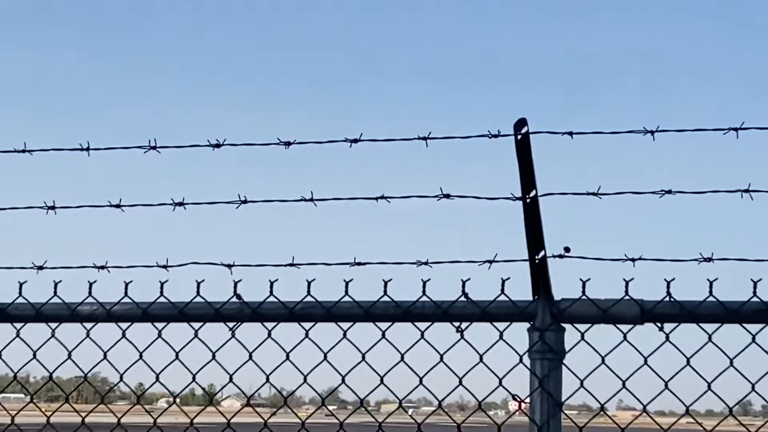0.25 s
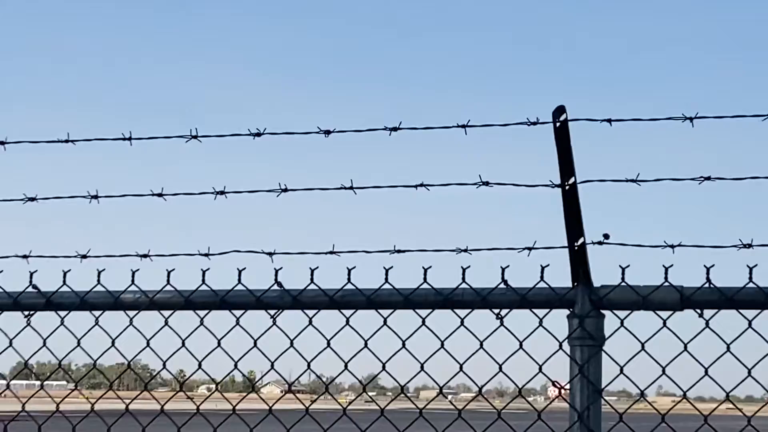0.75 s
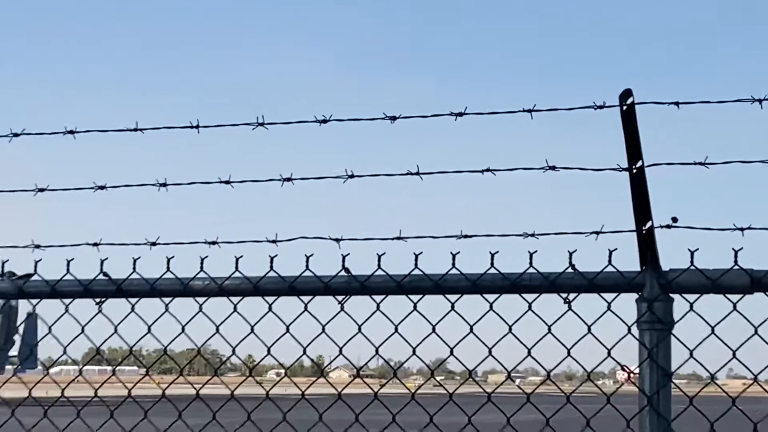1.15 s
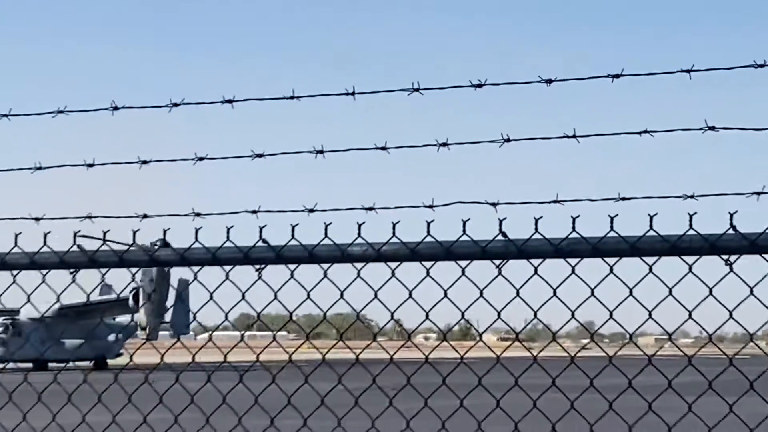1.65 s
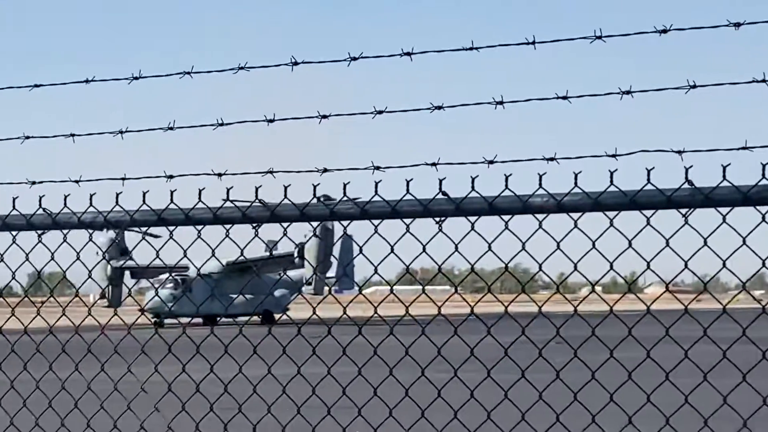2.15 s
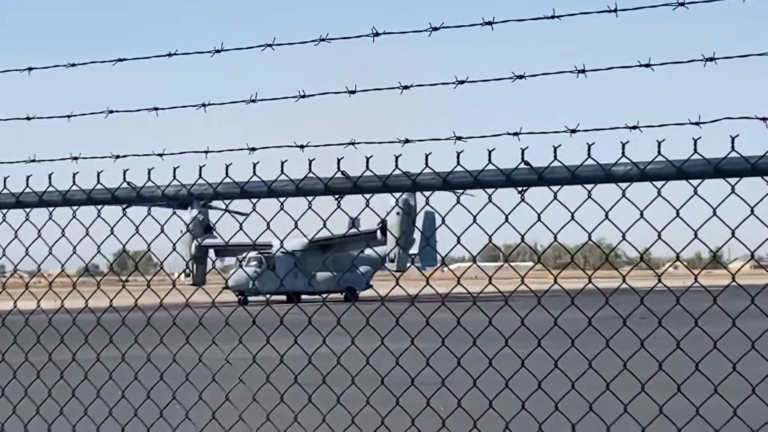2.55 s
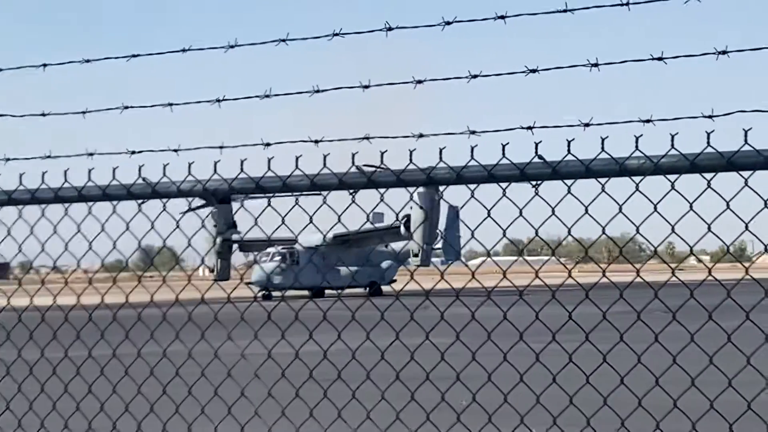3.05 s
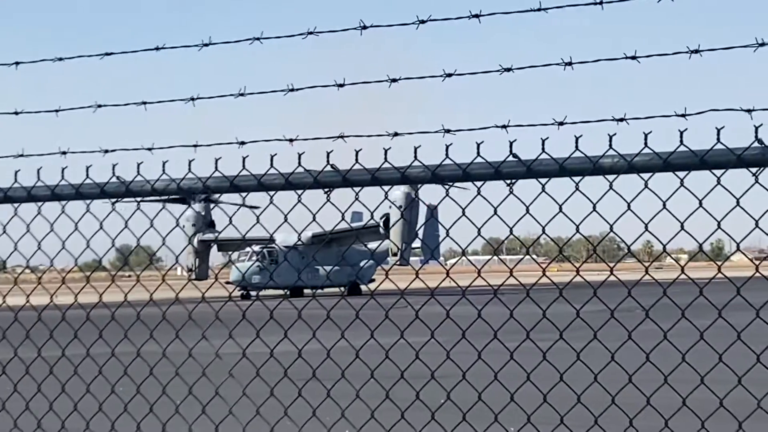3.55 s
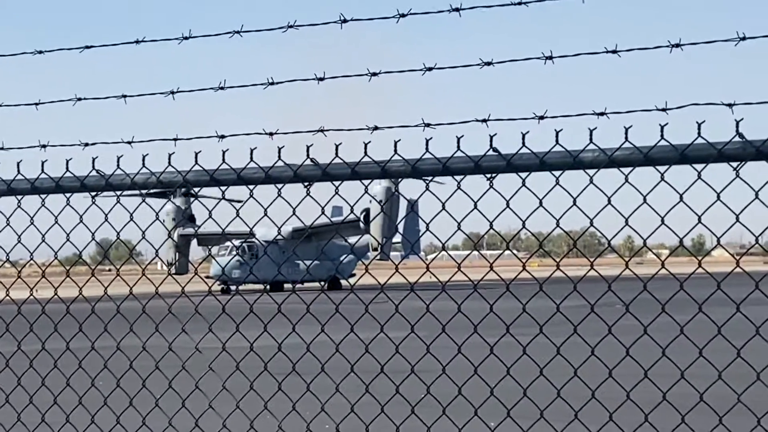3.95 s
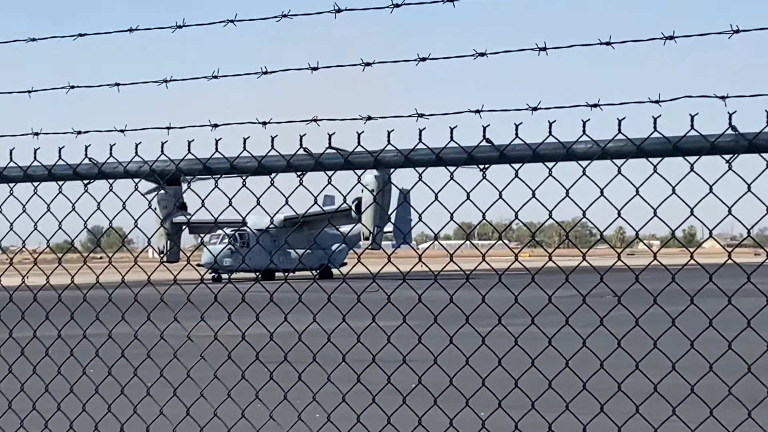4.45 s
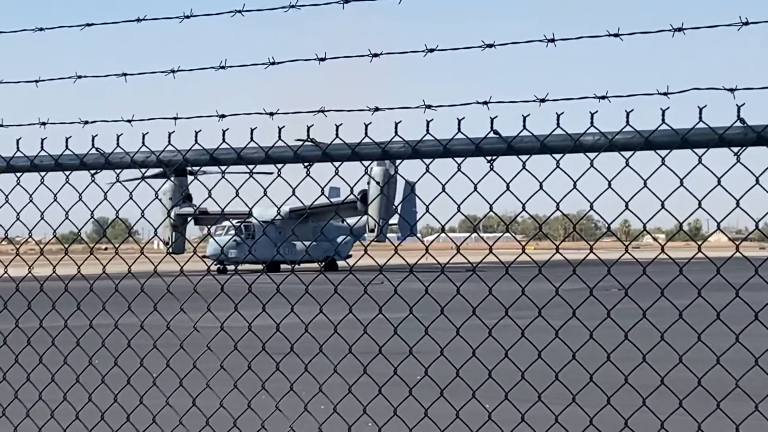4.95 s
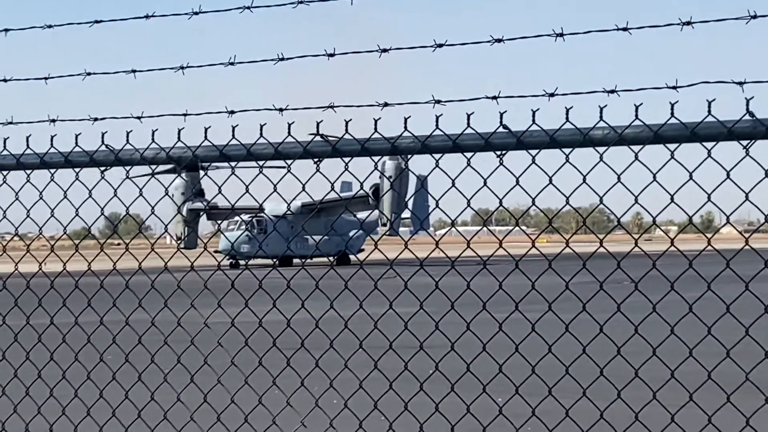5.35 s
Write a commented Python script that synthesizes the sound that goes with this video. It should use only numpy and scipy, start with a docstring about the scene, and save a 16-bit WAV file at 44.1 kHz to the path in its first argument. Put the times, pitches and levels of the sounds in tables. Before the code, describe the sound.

A tiltrotor idles on an open apron, heard on a handheld stereo phone from behind a fence. A constant rushing roar is chopped about fifteen times a second over low, uneven rotor thudding. At first the midrange is slightly dulled and leans left; from one to just over two seconds the sound brightens and a piercing whine emerges, then wavers to the end.

```python
"""Tiltrotor idling on an apron

Recorded in stereo on a hand-held phone from behind the perimeter fence, first turned away, then facing.
Rotors: low noise and short pulses at the blade rate. Turbines: coloured noise, rush and hiss, chopped
some fifteen times a second. Gearboxes, drive shaft and compressor: wavering sine tones.
The midrange and the whine open up as the phone turns, then swell and sink with the breeze."""
import sys
import numpy as np
from scipy import signal
from scipy.fft import rfft, irfft, next_fast_len
from scipy.io import wavfile
from scipy.ndimage import uniform_filter1d

SR = 44100
rng = np.random.default_rng(int(sys.argv[2]) if len(sys.argv) > 2 else 0)


def to_wav(sig):
    """Store sig (one row per channel, or 1-D mono) as 16-bit WAV at the path in sys.argv[1].

    Samples outside -1..1 are clipped; the rate is SR.
    """
    pcm = np.clip(np.atleast_2d(sig), -1, 1) * 32767
    pcm = np.round(pcm).astype(np.int16)
    wavfile.write(sys.argv[1], SR, pcm.T)  # frames by channels


N = 246959
TIME_S = np.arange(N) / SR
FFT_SIZE = next_fast_len(N)
BIN_HZ = np.fft.rfftfreq(FFT_SIZE, 1 / SR)

BLADE_HZ = 14.88  # blade passes per second
GEAR_HZ, DRIVE_HZ = 1094.7, 996.0  # tooth-mesh rates of the main gear and the drive gear
TURN_START_S, TURN_END_S = 1.0, 2.24  # the phone turns towards the aircraft
FADES_PER_S = 4.84


def undb(db):
    """Decibels to gain."""
    return 10 ** (np.asarray(db) / 20)


def unit(x):
    """Scale to rms 1."""
    return x / np.sqrt(np.mean(x ** 2))


def curves(table):
    """The columns of a table after start_s, each as one value per sample."""
    start_s, *columns = np.transpose(table)
    return [np.interp(TIME_S, start_s, column) for column in columns]


def humps(table):
    """Smooth rises and falls, one for each row of (centre_s, half_length_s, height)."""
    return sum(height * np.exp(-((TIME_S - centre_s) / half_s) ** 2) for centre_s, half_s, height in table)


def bin_gains(points):
    """Gain at each frequency bin, from (pitch_hz, level_db) points joined on a log axis."""
    hz, db = np.transpose(points)
    return undb(np.interp(np.log(BIN_HZ + 1), np.log(hz), db))


def colour(x, gains):
    """Filter by a gain per frequency bin."""
    return irfft(rfft(x, FFT_SIZE) * gains, FFT_SIZE)[:N]


def walk(rate):
    """Random levels held 1 / rate s, smoothed twice, cut to length and scaled to rms 1."""
    hold = int(SR / rate)
    steps = np.repeat(rng.standard_normal(N // hold + 2), hold)
    smooth = uniform_filter1d(uniform_filter1d(steps, hold), hold)
    return unit(smooth[:N])


def turbulence(points, flicker_db, flicker_rate, count=9):
    """Coloured noise whose octaves each flicker as eddies come and go."""
    octave = np.log2(np.clip(BIN_HZ / 40, 1, 2 ** (count - 1)))  # octaves above 40 Hz
    gains, out = bin_gains(points), 0
    for k in range(count):
        share = np.sqrt(np.clip(1 - abs(octave - k), 0, 1))
        band = colour(rng.standard_normal(N), gains * share)
        out = out + band * undb(flicker_db * walk(flicker_rate))
    return unit(out)


# How hard the blades chop the sound on its way to the fence.
# Columns: start_s, strength (1 = usual), rush_lag (blade passes), hiss_lag (blade passes)
BLADE_CHOP = [(0, .6, 1.03, 0.36), (1.0, 0.32, 0.79, .5), (1.7, 0.8, 0.76, 0.67), (2.2, 0.52, 0.75, 0.55),
              (2.8, 0.7, 0.67, .85), (3.8, 0.99, 0.7, 0.85), (4.5, 0.5, 0.62, 1.05), (5.0, 0.5, 0.63, 1.04),
              (5.6, 0.77, 0.57, 0.9)]


def swish(blade, depth_db, lag, edge=0.57):
    """Gain that swells once per passing blade, lopsided in time, its depth scaled by the chop strength."""
    angle = 2 * np.pi * (blade - lag)
    shape = np.cos(angle) - edge * np.sin(2 * angle)
    return unit(undb(depth_db * curves(BLADE_CHOP)[0] * shape))


def tone(hz, scatter, scatter_rate, wander_hz):
    """A steady tone plus a share scattered by the hot, swirling air, which makes it flutter."""
    phase = 2 * np.pi * np.cumsum(hz + wander_hz * walk(2.01)) / SR
    in_step = (1 + scatter * walk(scatter_rate)) * np.sin(phase)
    return unit(in_step + scatter * walk(scatter_rate) * np.cos(phase))


def turned_away():
    """1 while the phone points away from the aircraft, 0 once it faces it."""
    return np.interp(TIME_S, [TURN_START_S, TURN_END_S], [1, 0])


# The breeze carries the sound over to the fence, or holds it back.
# Columns: centre_s, half_length_s, strength (1 = full swell)
BREEZE_SWELLS = [(2.42, 0.3, 0.98), (3.62, 0.22, -0.55), (4.03, 0.4, -0.23), (5.23, .12, -0.2),
                 (5.43, 0.08, 0.69)]


def heard_db(source):
    """Level from (faced_db, away_change_db, full_swell_lift_db, random_fading_db)."""
    faced_db, away_db, swell_db, fade_db = source
    turn_and_swell_db = away_db * turned_away() + swell_db * humps(BREEZE_SWELLS)
    return faced_db + turn_and_swell_db + fade_db * walk(FADES_PER_S)


# Weak wavering tones: the drive gear's fundamental, and what may be a second gearbox.
# Columns: pitch_hz, level_db (at the median level of the rush)
WEAK_TONES = [(996, -43.5), (1009.5, -46), (1114.3, -42), (2226, -49), (4320, -56.5)]


def shaft_hum_and_weak_tones(rush_db):
    """A low drive-shaft hum and weak wavering tones that come forward with the engines' rush."""
    hum = tone(14 * BLADE_HZ, scatter=.12, scatter_rate=8, wander_hz=.15)
    tones = sum(undb(db) * tone(hz, scatter=0.32, scatter_rate=33, wander_hz=0.914)
                for hz, db in WEAK_TONES)
    return (hum * undb(-35) + tones) * undb(rush_db - np.median(rush_db))


# Compressor level. Values: faced_db, away_change_db, full_swell_lift_db, random_fading_db
COMPRESSOR_LEVEL = (-48, -8, 0, 1)
# Its whistle comes forward around the turn. Columns: centre_s, half_length_s, lift_db
COMPRESSOR_BEAM = [(1.3, .2, 9), (1.95, .28, 7)]


def compressor_whistle():
    """The compressor's thin whistle, a single high tone that flutters in the swirling air."""
    whistle = tone(5415.7, scatter=.3, scatter_rate=31, wander_hz=2.11)
    return whistle * undb(heard_db(COMPRESSOR_LEVEL) + humps(COMPRESSOR_BEAM))


# Colour of the blades' whistle. Columns: pitch_hz, level_db (per Hz)
WHISTLE_COLOUR = [(5200, -34), (5650, 4), (5800, 3), (6050, -5), (6350, -35)]


def blade_whistle(blade, start_db=-41.5, fade_db_per_s=5.5):
    """A narrow band of breathy noise that swells with each passing blade and fades away steadily."""
    air = turbulence(WHISTLE_COLOUR, flicker_db=2.5, flicker_rate=30)
    puffs = air * swish(blade, depth_db=13, lag=0.43, edge=0.33)
    return puffs * undb(start_db - fade_db_per_s * TIME_S)


def turbine_hiss(blade, points):
    """Fine hiss of the engines; each blade's wake ruffles it a little differently."""
    air = turbulence(points, flicker_db=1.6, flicker_rate=60)
    uneven_blade = blade + 0.11 * walk(9.6)
    return air * swish(uneven_blade, depth_db=1.47, lag=curves(BLADE_CHOP)[2])


# Hiss that reaches the phone only side-on, before the turn is over. Columns: pitch_hz, level_db (per Hz)
SIDELONG_COLOUR = [(1800, -21), (2500, 2), (3050, 2), (3700, -11), (6300, -26), (7400, -11), (8500, -39)]


def sidelong_hiss(blade):
    """Turbine hiss that dies out as the phone turns to the aircraft."""
    return turbine_hiss(blade, SIDELONG_COLOUR) * undb(-39) * turned_away()


# Colours of the hiss and the intake. Columns: pitch_hz, level_db (per Hz)
HISS_COLOUR = [(1500, -30), (2700, 6), (3400, 5), (4300, -3.5), (5200, -2.5), (5800, 3.5), (6200, 1),
               (6700, 3), (7450, -8), (8200, -13.5), (9500, -29), (11500, -36), (14000, -50)]
INTAKE_COLOUR = [(2000, -38), (3400, -5), (4100, 0), (4900, 3), (5400, 1.5), (6200, -5.5), (8000, -54)]
# Their levels. Values: faced_db, away_change_db, full_swell_lift_db, random_fading_db
HISS_LEVEL = (-35.5, -0.5, 0, 1.1)
INTAKE_LEVEL = (-37.5, -1, -1, -1.45)
# The hiss flares and sinks more quickly than the breeze. Columns: centre_s, half_length_s, lift_db
HISS_FLARES = [(1.29, 0.061, 2.5), (2.53, .14, 0.5), (3.12, 0.34, -1.3), (3.87, 0.13, 1),
               (4.97, 0.13, -0.5), (5.55, .07, 2)]


def hiss_and_intake(blade):
    """Two bands of turbine hiss, separately ruffled, that flare together."""
    flare_db = humps(HISS_FLARES)
    hiss = turbine_hiss(blade, HISS_COLOUR) * undb(heard_db(HISS_LEVEL) + flare_db)
    intake = turbine_hiss(blade, INTAKE_COLOUR) * undb(heard_db(INTAKE_LEVEL) + flare_db)
    return hiss + intake


# Overtones of the two gear meshes. Columns: multiple, level_db (against their gear's level)
GEAR_ORDERS = [(2, -8.5)]
DRIVE_ORDERS = [(3, -9.5), (4, -16.5), (5, -18)]
# Those gears' levels. Values: faced_db, away_change_db, full_swell_lift_db, random_fading_db
GEAR_LEVEL = (-32.5, -7, 2, -1)
DRIVE_LEVEL = (-36, -5.5, 3.5, 0.5)
# The drive overtones sink back or come forward. Columns: centre_s, half_length_s, lift_db
DRIVE_BEAM = [(1.9, 0.55, -6), (4.3, .5, 1.5), (5.5, .35, 1.5)]
# The loudest whine, the main gear's fundamental. Columns: start_s, level_db
GEAR_WHINE = [(0, -42), (.2, -36.5), (.6, -34.5), (.72, -38), (1.06, -40), (1.17, -35), (1.45, -33.5),
              (1.75, -29), (2.1, -26), (2.35, -25.5), (2.52, -30.5), (2.95, -26.5), (3.08, -28.5),
              (3.3, -27.5), (3.6, -33.5), (3.88, -27), (4.4, -26.3), (4.75, -27.5), (4.95, -31),
              (5.08, -26.5), (5.3, -33), (5.47, -29.5), (5.6, -29)]
# The whine at twice the drive gear's mesh rate. Columns: start_s, level_db
DRIVE_WHINE = [(0, -51), (.7, -36), (1.5, -50), (1.72, -38), (2.0, -34), (2.27, -28.5), (2.5, -39),
               (2.7, -31.5), (3.03, -47), (3.25, -34.5), (3.6, -33.5), (4.0, -37.5), (4.55, -40),
               (4.85, -32), (5.2, -36.5), (5.5, -32.5)]
# Its close neighbour, which beats against it. Columns: start_s, level_db
NEIGHBOUR_WHINE = [(0, -36.5), (.7, -48), (1.45, -54), (1.75, -45), (2.05, -54), (2.3, -32), (2.6, -38),
                   (2.95, -48), (3.25, -31), (3.6, -49), (4.3, -47), (5.05, -53), (5.45, -37), (5.6, -33)]
# The main gear's upper overtones, a narrow beam that wanders across the phone.
# Columns: start_s, third_overtone_db, fourth_overtone_db (three and four times the mesh rate)
GEAR_BEAM = [(0, -57, -60), (1.1, -56, -62), (1.4, -50, -58), (2.0, -50.5, -55), (2.6, -53, -51),
             (3.0, -48, -49.5), (3.35, -47.5, -49), (3.6, -55, -50), (3.8, -45, -47), (4.2, -45.5, -45.5),
             (4.55, -51, -51), (5.05, -56, -55), (5.6, -49.5, -52)]


def main_gear(blade):
    """The main gear's tooth-mesh tone and overtones; the highest two wander in level on their own."""
    main = tone(GEAR_HZ, scatter=0.073, scatter_rate=27, wander_hz=0.27)
    main = main * swish(blade, depth_db=0.5, lag=0.44) * undb(curves(GEAR_WHINE)[0])
    overtones = sum(undb(db) * tone(k * GEAR_HZ, scatter=0.11 * k, scatter_rate=37, wander_hz=0.302 * k)
                    for k, db in GEAR_ORDERS)
    third = tone(3 * GEAR_HZ, scatter=0.37, scatter_rate=38, wander_hz=0.635)
    fourth = tone(4 * GEAR_HZ, scatter=0.75, scatter_rate=45, wander_hz=2.13)
    third_db, fourth_db = curves(GEAR_BEAM)
    beam = third * undb(third_db) + fourth * undb(fourth_db)
    return main + overtones * undb(heard_db(GEAR_LEVEL)) + beam


def drive_gear(blade):
    """The drive gear's overtones, chopped by the blades, and a close pair of tones that beats."""
    second = tone(2 * DRIVE_HZ, scatter=0.23, scatter_rate=70, wander_hz=0.803)
    second = second * swish(blade, depth_db=0.5, lag=0.82)
    neighbour = tone(2019.5, scatter=0.26, scatter_rate=59, wander_hz=1.53)
    pair = second * undb(curves(DRIVE_WHINE)[0]) + neighbour * undb(curves(NEIGHBOUR_WHINE)[0])
    overtones = sum(undb(db) * tone(k * DRIVE_HZ, scatter=0.21 * k, scatter_rate=45, wander_hz=0.45 * k)
                    for k, db in DRIVE_ORDERS)
    overtones = overtones * undb(heard_db(DRIVE_LEVEL) + humps(DRIVE_BEAM))
    return pair + overtones * swish(blade, depth_db=4.0, lag=0.89)


# The low part of the engines' roar. Columns: pitch_hz, level_db (per Hz)
ROAR_COLOUR = [(120, -5), (280, 0), (430, 3.5), (650, 2), (900, -1.5), (1300, -14.5), (2500, -42.5)]
# Its level. Values: faced_db, away_change_db, full_swell_lift_db, random_fading_db
ROAR_LEVEL = (-27.5, -0.04, 2.5, 0.64)


def exhaust_roar(blade):
    """The low roar of the engines, only lightly chopped and nearly as loud with the phone turned away."""
    air = turbulence(ROAR_COLOUR, flicker_db=-0.2, flicker_rate=23)
    # the negative depth dips where a positive one swells
    return air * swish(blade, depth_db=-0.3, lag=0.67) * undb(heard_db(ROAR_LEVEL))


# The bright part of the engines' roar. Columns: pitch_hz, level_db (per Hz)
RUSH_COLOUR = [(200, -15), (450, -4), (800, 0.5), (1100, 0.5), (1350, 1), (1600, 0), (1900, 1.7), (2020, 2),
               (2110, 0.5), (2500, -6), (3200, -14.5), (4200, -17), (7000, -47), (12000, -70)]
# Its level. Values: faced_db, away_change_db, full_swell_lift_db, random_fading_db
RUSH_LEVEL = (-25, -3, 0.7, 1.3)


def exhaust_rush(blade, rush_db):
    """The bright roar of the engines, chopped by the blades."""
    air = turbulence(RUSH_COLOUR, flicker_db=.5, flicker_rate=44)
    return air * swish(blade, depth_db=2.5, lag=curves(BLADE_CHOP)[1]) * undb(rush_db)


# A reflection cancels a band that slides down as the phone turns. Columns: start_s, pitch_hz, depth_db
REFLECTION_NOTCH = [(0, 4900, 2.5), (1.0, 4540, 3), (1.6, 4300, 2.5), (2.1, 3480, 2.5), (2.7, 3430, 2),
                    (3.9, 3570, 1), (4.5, 3650, 3.5), (5.0, 3400, 4.5), (5.6, 3650, 4.5)]


def sliding_notch(x, octaves=0.26, size=512):
    """Hollow out the band that the reflection cancels."""
    hz, s, frames = signal.stft(x, SR, nperseg=size)
    start_s, notch_hz, depth_db = np.transpose(REFLECTION_NOTCH)
    distance = np.log2((hz[:, None] + 1) / np.interp(s, start_s, notch_hz)) / octaves
    gain = undb(-np.interp(s, start_s, depth_db) * np.exp(-distance ** 2))
    return signal.istft(frames * gain, SR, nperseg=size)[1][:N]


# The two rotors, the second one stronger. Columns: lag (blade passes), strength
ROTORS = [(0.934, 0.66), (0.65, 0.87)]
# Colour of a thud. Columns: pitch_hz, level_db (per Hz)
THUD_COLOUR = [(25, -26.5), (55, -4), (100, 10), (220, 6), (320, 0.5), (700, -32), (3000, -100)]


def blade_thuds(jitter_s=0.0017, scatter_db=5.0):
    """Each blade of each rotor sends out one short pressure pulse, uneven in timing and strength."""
    pulses, passes = np.zeros(N), np.arange(int(BLADE_HZ * N / SR))
    for lag, strength in ROTORS:
        late, size = rng.standard_normal((len(passes), 2)).T
        at = ((passes + lag) / BLADE_HZ + jitter_s * late) * SR
        pulses[np.clip(at, 0, N - 1).astype(int)] += strength * undb(scatter_db * size)
    thuds = colour(pulses, 1j * bin_gains(THUD_COLOUR))  # 1j: a quarter-cycle phase shift
    return unit(thuds) * undb(-33.5)


def rotor_wash(blade, points, slap_db, slap_width=0.08):
    """Low churning air; rotors take turns, each blade cutting the wake before it with an uneven thud."""
    slap = 0
    for lag, strength in ROTORS:
        passes_off = (blade - lag + .5) % 1 - .5
        slap = slap + strength * np.exp(-(passes_off / slap_width) ** 2)
    air = turbulence(points, flicker_db=0.1, flicker_rate=19)
    return unit(air * undb(slap_db * slap * (1 + 0.4 * walk(6.9))))


# The deepest downwash. Columns: pitch_hz, level_db (per Hz)
SURGE_COLOUR = [(15, -35), (24, -26), (35, -9), (48, 1.5), (75, 4.5), (105, 4.5), (135, -8.5), (220, -26),
                (600, -59)]
# Its gusts. Columns: centre_s, half_length_s, lift_db (over its steady level)
DOWNWASH_GUSTS = [(.12, 0.08, 7), (.57, 0.09, 8), (1.0, .08, 1.5), (1.42, 0.057, 1.5), (1.95, 0.24, 4.5),
                  (2.66, 0.27, 5.5), (3.1, 0.084, 4.5), (3.35, 0.067, 5), (3.71, 0.095, 6.5),
                  (4.08, 0.048, 9.5)]


def downwash_surge(blade):
    """The deepest churning air, swelling in gusts."""
    surge_db = -32.5 + humps(DOWNWASH_GUSTS) + 1 * walk(FADES_PER_S)  # 1 dB of random fading
    return rotor_wash(blade, SURGE_COLOUR, slap_db=0.5) * undb(surge_db)


# The main rotor wash. Columns: pitch_hz, level_db (per Hz)
WASH_COLOUR = [(50, -40), (95, -6.5), (130, -0.7), (220, 1.5), (290, -3.5), (420, -13), (800, -30),
               (2000, -82)]
# Its level. Values: faced_db, away_change_db, full_swell_lift_db, random_fading_db
WASH_LEVEL = (-25.5, -1, 0.5, 0.4)


def main_wash(blade):
    """The body of the rotors' churning air, with the stronger slap of the blades."""
    return rotor_wash(blade, WASH_COLOUR, slap_db=2.5) * undb(heard_db(WASH_LEVEL))


def aircraft(blade):
    """All the sources together at their heard levels."""
    rush_db = heard_db(RUSH_LEVEL)
    tones = shaft_hum_and_weak_tones(rush_db) + compressor_whistle() + main_gear(blade) + drive_gear(blade)
    side_on = blade_whistle(blade) + sidelong_hiss(blade)
    engines = hiss_and_intake(blade) + exhaust_roar(blade) + exhaust_rush(blade, rush_db)
    rotors = blade_thuds() + downwash_surge(blade) + main_wash(blade)
    return tones + side_on + sliding_notch(engines) + rotors


# Scattered side sound against the direct mid sound. Columns: pitch_hz, level_db
STEREO_WIDTH = [(60, -29), (180, -23), (520, -16), (850, -11), (1100, -13), (1500, -7), (2100, -23.5),
                (3000, -25), (4000, -60)]
# Full lean of the direct sound, left minus right. Columns: pitch_hz, level_db
LEFT_LEAN = [(60, .4), (300, .9), (400, 1.7), (680, .9), (820, 3.8), (980, 4.8), (1090, .5), (1420, 2.9),
             (2000, .6), (2800, 0)]


def scene():
    """The direct sound leans left, more so before the turn; sound scattered over the apron gives width."""
    blade = BLADE_HZ * TIME_S  # blade passes so far
    direct = aircraft(blade)
    scattered = colour(aircraft(blade), bin_gains(STEREO_WIDTH))  # fresh random draws
    ratio = bin_gains(LEFT_LEAN)
    lean_share = 0.87 + 1 * turned_away()  # share when facing, plus the extra when turned away
    lean = colour(direct, (ratio - 1) / (ratio + 1)) * lean_share
    return np.array([direct + lean + scattered, direct - lean - scattered])


def record(dry, low_cut_hz=25, top_hz=12200, ports_hz=7500, port_lag_s=.000278):
    """The phone's left port gets the highest treble late; the deepest bass and the top are cut."""
    late_treble = np.exp(-2j * np.pi * BIN_HZ * port_lag_s * (BIN_HZ > ports_hz))
    left = colour(dry[0], late_treble)
    low_cut = signal.butter(3, low_cut_hz, "high", fs=SR, output="sos")
    top_cut = signal.ellip(8, .2, 70, top_hz, fs=SR, output="sos")
    return signal.sosfilt(top_cut, signal.sosfilt(low_cut, [left, dry[1]]))


dry = scene()
out = record(dry)
to_wav(out)
```